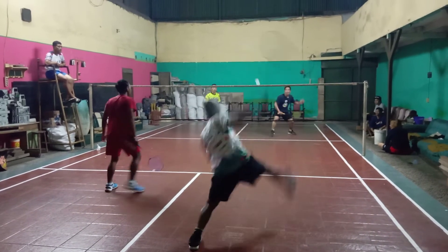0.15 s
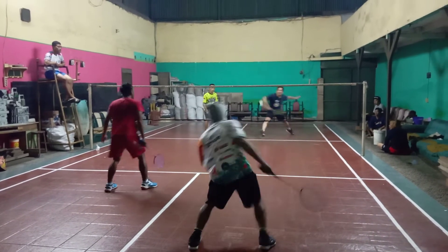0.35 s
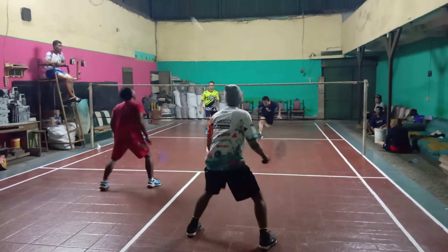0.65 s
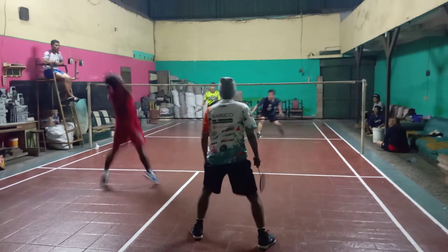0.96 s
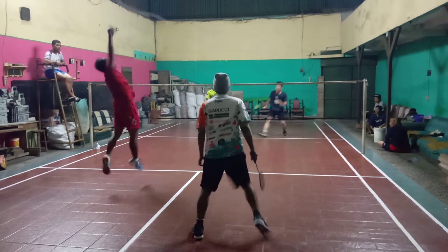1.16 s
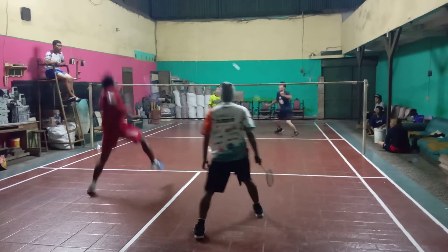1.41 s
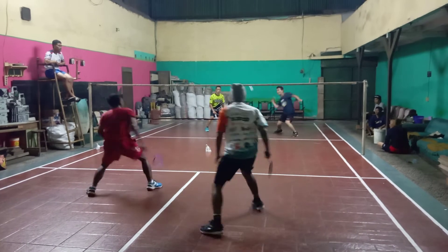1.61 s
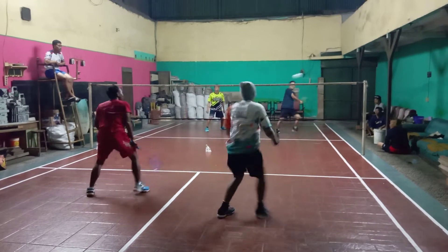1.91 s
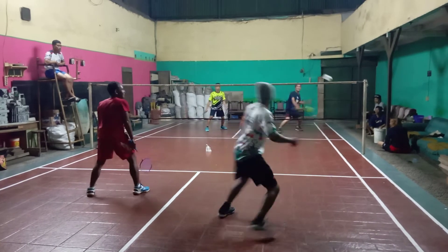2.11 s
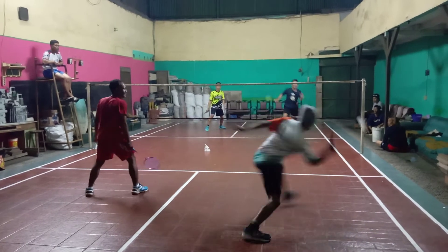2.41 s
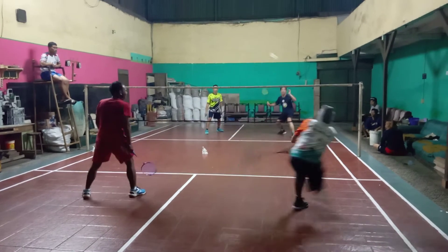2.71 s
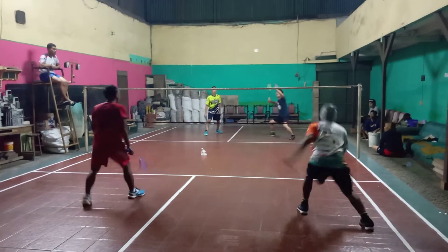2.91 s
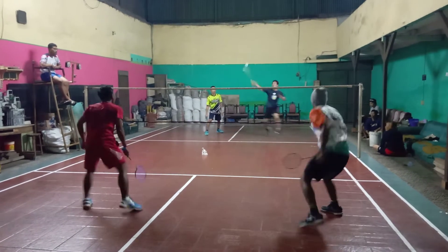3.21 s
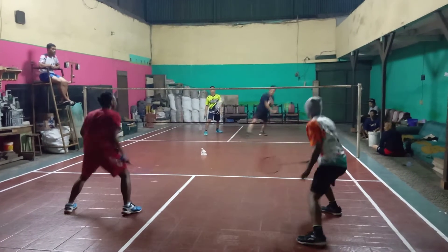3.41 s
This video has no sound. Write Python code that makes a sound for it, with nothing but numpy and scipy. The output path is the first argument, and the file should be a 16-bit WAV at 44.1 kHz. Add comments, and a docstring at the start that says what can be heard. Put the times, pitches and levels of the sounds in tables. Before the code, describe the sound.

Badminton rackets crack against a shuttlecock about six times, each hit echoing through a large sports hall. Between strokes, shoes thud, scuff and briefly squeak on the court, heard from behind the near baseline.

```python
"""A racket cracks and a large, hard-walled hall rings on: a badminton rally, heard from behind
the near baseline through one small microphone. Cork strikes the strings, setting them and the frame
ringing; floor, walls and roof throw the sound back. Between strokes, shoes thud, scuff and squeak
on the court, and one landing raises a low boom. Air swishes round the racket on the later strokes."""
import sys
import numpy as np
from scipy import signal
from scipy.fft import rfft, irfft
from scipy.io import wavfile

SR = 44100
rng = np.random.default_rng(int(sys.argv[2]) if len(sys.argv) > 2 else 0)


def unload_audio(sound):
    """Save the sound as a 16-bit wav file, at the path given as the first command line argument."""
    columns = np.transpose(np.atleast_2d(sound))
    # keep every value between -1 and 1, then stretch to whole-number steps
    steps = np.round(np.clip(columns, -1, 1) * 32767)
    wavfile.write(sys.argv[1], SR, steps.astype(np.int16))


N = 156555

# Racket strokes: start_s, direct_db, early_db, string_hz, string_db, frame_hz, frame_db,
# then crack_db in each of the six crack bands
STROKES = [ (-.012, -20, -4.5, 1085, 3, 3900, -13, 11.4, 6.9, 8.1, 8.5, 11, 11.6),
           (0.5079, -11, -7.5, 918, 4.5, 1420, -6.5, 1.5, 5.4, 2.4, 1, -2, 1.5),
           (1.2059, -6.5, -3.5, 1040, -3, 1950, -5, 12.1, 12.8, 6.8, 7, 6, 8.4),
           (1.7859, -14, -9, 938, -7, 2615, 6, 9, 7.9, 9.7, 11.5, 9, 10.6),
           (2.5894, -9, -8, 1086, 2.5, 1720, -4.5, 18.3, 12.6, 8.1, 9.5, 7.5, 9.5),
           (3.306, -11.5, -8.5, 1150, -13, 1740, -6, 17.5, 19.1, 16.3, 19, 9.5, 15)]
# Bands of the cork's crack: frequency_hz
CRACK_BANDS_HZ = [250, 600, 1200, 2500, 4200, 7000]
# Modes of the string bed: pitch_ratio, level_db, t60_s
STRING_MODES = [(0.998, 7.5, 0.048), (1.561, 3.5, 0.16), (2.08, -29, 0.15), (2.5, -8, 0.022),
                (3.42, -5, 0.024)]
# Bright edge of the sound that reaches the microphone directly: pitch_hz, level_db, t60_s
DIRECT_PINGS = [(6320, 6.5, 0.024), (14800, -12, 0.012)]
# Distinct returns from floor, walls and roof: arrival_s (scene time), level_db, smear_t60_s
ECHOES = [(.066, -9.5, 0.25), (0.089, -13, 0.083), (1.273, -9.5, 0.13), (1.7928, -6, 0.011),
          (1.798, -15.5, 0.0067), (1.814, -8, .03), (1.823, -9, 0.12), (2.5921, -7.5, 0.0053),
          (2.594, -8, 0.011), (2.6, -8.5, 0.039), (2.679, -13.5, 0.12), (3.315, -12, 0.022),
          (3.336, -19, 0.04), (3.343, -11, 0.035)]

# The hall's diffuse tail, one list each, band by band: frequency_hz, t60_s, level_db
HALL_BANDS_HZ = [125, 250, 450, 750, 1100, 2200, 4000, 6500, 10000, 15000]
HALL_T60_S = [1.47, 1, 1.6, 0.98, 0.97, 1.13, 1.36, 1.3, 1.02, 0.65]
HALL_DB = [-1.5, -3.5, -2, -1, -0.5, 0, 1, 1, -0.5, -2.5]
# Spectrum of the hall's quiet air: frequency_hz, level_db
ROOM_TONE = [(30, -6), (120, 10), (350, -11), (730, -50), (1400, 1.5), (3000, 4), (6500, -2),
             (11000, -9), (15000, -16)]

# Footfalls on the court: start_s, thud_db, thud_hz, slap_db, hall_db
FOOTFALLS = [(.108, 10.5, 190, -4.5, 0), (.163, 12.5, 164, -1, 2.5), (0.3421, 14, 370, -7, 0),
             (.396, -0.5, 278, -4.5, 1.5), (0.5079, 20.5, 214, -2, -4.5), (.541, 12.5, 480, -10, -20),
             (0.571, 13, 151, -20, -1.5), (0.703, 4, 193, -18, -10), (0.937, -30, 250, -24.5, 9),
             (1.017, -8.5, 353, -29, -5), (1.269, 13, 297, -25, -4), (1.449, 5.5, 350, -16, -1),
             (1.502, 16.5, 230, -7.5, -1), (1.573, 1.5, 398, -10, 7), (1.702, -0.5, 378, -7.5, -3),
             (2.198, 11, 307, -15, -6), (2.241, 3.5, 298, -13, -7), (2.856, 12.5, 293, -4, -5.5),
             (2.955, 0.5, 282, -4.5, 4)]
# Spectrum of a foot's thud: pitch_ratio, level_db
THUD_SPECTRUM = [(.25, -11.5), (.55, -6.5), (1, -5.5), (1.6, -13.5), (3, -20.5), (8, -30), (20, -54)]
# Spectrum of a sole's slap: frequency_hz, level_db
SLAP_SPECTRUM = [(200, -7.5), (700, -11.5), (1500, -5.5), (3000, -2), (6000, -6), (12000, -11.5)]
# Shoe scuffs and sharp ticks: start_s, pitch_hz, level_db, t60_s
SCUFFS = [(.346, 5660, 0, .2), (.368, 2840, 3, .1), (0.933, 3254, -28, 0.045), (0.984, 3380, -18, 0.092),
          (1.5688, 3240, -1, 0.0085), (1.569, 8100, -1, 0.011), (1.6107, 3920, 5, .006),
          (1.6101, 6000, 2.5, .008), (1.617, 4200, -14, .03), (1.706, 2520, -3.5, .06),
          (2.866, 2420, 10, 0.065), (3.2332, 4980, 6.5, 0.051), (3.234, 2580, 3.5, 0.063)]
# Spectrum of a scuff: pitch_ratio, level_db
SCUFF_SPECTRUM = [(.2, -14), (.7, -17), (1, -2), (1.35, -19), (3, -19.5)]
# Rubber soles squeaking: middle_s, half_length_s, pitch_hz, level_db
SQUEAKS = [(0.384, 0.018, 3020, -44), (3.477, 0.023, 4830, -36), (3.518, 0.033, 4820, -31)]

# Racket swings: top_speed_s, rise_s, pitch_hz, whistle_db, hiss_db
SWISHES = [(1.183, 0.021, 520, -46, -39.5), (1.787, .012, 990, -43.5, -49),
           (2.570, 0.035, 453.5, -44.5, -40.5), (3.303, .025, 1072, -45.5, -40)]
# Spectrum of air hissing through the strings: frequency_hz, level_db
HISS_SPECTRUM = [(600, -12), (1100, -2.5), (2800, -6), (6500, 0), (12000, 1)]

# Response of the microphone: frequency_hz, gain_db
MICROPHONE = [(30, -26), (75, -19.5), (125, -4.5), (200, 0), (4800, 0), (6500, 5), (8000, -3.5),
              (10000, -12), (12500, -18.5), (14000, -17.5), (14900, -4.5), (16000, -16)]


def undb(db):
    """Decibels to gain."""
    return 10 ** (np.asarray(db) / 20)


def noise():
    """White noise as long as the scene."""
    return rng.standard_normal(N)


def unit(x):
    """Scale to unit energy."""
    return x / np.sqrt(np.sum(x ** 2))


def fade(t, t60):
    """Exponential decay, 60 dB down after t60."""
    return np.exp(-np.log(1000) * t / t60)


def through(x, response):
    """Convolve, keeping the length."""
    return signal.fftconvolve(x, response)[:len(x)]


def lowpass(x, hz):
    """Roll off above hz at 12 dB an octave."""
    return signal.sosfilt(signal.butter(2, hz, fs=SR, output="sos"), x)


def colour(x, points, size=4096):
    """Minimum-phase filter that follows (frequency_hz, gain_db) points."""
    hz, db = np.array(points, float).T
    bins_hz = np.maximum(np.fft.rfftfreq(size, 1 / SR), 1)
    gain = undb(np.interp(np.log(bins_hz), np.log(hz), db))
    cepstrum = irfft(np.log(gain))
    cepstrum[1:size // 2] *= 2
    cepstrum[size // 2 + 1:] = 0
    return through(x, irfft(np.exp(rfft(cepstrum))))


def burst(t60, size=8192):
    """A dying spray of tiny contacts with an even spectrum and unit energy."""
    envelope = fade(np.arange(size) / SR, t60)
    limit = 2 * np.sqrt(2) * unit(envelope)
    x = rng.standard_normal(size) * envelope
    for _ in range(3):  # flatten the spectrum, then restore the decay
        spectrum = rfft(x)
        x = np.clip(irfft(spectrum / (np.abs(spectrum) + 1e-12)), -limit, limit)
    return unit(x)


def ring(x, hz, t60):
    """One damped mode driven by x, gain 1 at its pitch."""
    t = np.arange(len(x)) / SR
    envelope = fade(t, t60)
    return through(x, 2 * envelope * np.cos(2 * np.pi * hz * t) / envelope.sum())


def add(out, start_s, x):
    """Mix a sound in at start_s, dropping what falls outside the scene."""
    i = int(round(start_s * SR))
    x, i = x[max(-i, 0):], max(i, 0)
    out[i:i + len(x)] += x[:max(len(out) - i, 0)]


def strokes(early, tail):
    """Cork cracks on the strings, which ping with the frame; echoes and the hall answer."""
    out = np.zeros(N)
    for start_s, direct_db, early_db, string_hz, string_db, frame_hz, frame_db, *crack_db in STROKES:
        crack = colour(burst(t60=.014), list(zip(CRACK_BANDS_HZ, crack_db)))
        frame = undb(frame_db) * ring(crack, frame_hz, t60=.011)
        strings = sum(undb(string_db + db) * ring(crack, string_hz * ratio, t60)
                      for ratio, db, t60 in STRING_MODES)
        hit = crack + frame + strings
        edge = sum(undb(db) * ring(hit, hz, t60) for hz, db, t60 in DIRECT_PINGS)
        add(out, start_s, undb(direct_db) * (hit + edge))
        add(out, start_s, signal.fftconvolve(hit, undb(early_db) * early + tail))
        for arrival_s, db, smear_t60 in ECHOES:
            if 0 < arrival_s - start_s < .5:  # this stroke's own echoes
                add(out, arrival_s, undb(db) * through(hit, burst(smear_t60)))
    return out


def hall(gap_s=.0015, build_s=.022):
    """Responses of the hard walls: grainy early reflections, and a tail that dies band by band."""
    t = np.arange(2 * SR) / SR
    grains = rng.standard_normal(len(t)) * np.exp(.61 * rng.standard_normal(len(t)))
    early = grains * fade(t, t60=.2) * (t > gap_s)
    spectrum = rfft(rng.standard_normal(len(t)))
    log_hz = np.log(np.maximum(np.fft.rfftfreq(len(t), 1 / SR), 1))
    build_up = 1 - np.exp(-t / build_s)
    tail = 0
    for share, t60, db in zip(np.eye(len(HALL_BANDS_HZ)), HALL_T60_S, HALL_DB):
        band = irfft(spectrum * np.interp(log_hz, np.log(HALL_BANDS_HZ), share))
        tail += undb(db) * band * unit(fade(t, t60) * build_up)
    return unit(early), tail


def room_tone(level_db=-58):
    """The hall's quiet air: a steady low rumble and faint hiss."""
    return undb(level_db) * np.sqrt(N) * unit(colour(noise(), ROOM_TONE))


def shoes(early, tail, toe_lag_s=.009, toe_db=-2, scuff_hall_db=-11.5, early_db=-2.5):
    """Heel then toe thud and slap on the court; soles catch in short scuffs."""
    direct, to_hall = np.zeros(N), np.zeros(N)
    for start_s, thud_db, thud_hz, slap_db, hall_db in FOOTFALLS:
        thud_spectrum = [(ratio * thud_hz, db) for ratio, db in THUD_SPECTRUM]
        for lag_s, contact_db in ((0, 0), (toe_lag_s, toe_db)):
            thud = undb(thud_db) * colour(burst(t60=.026), thud_spectrum)
            slap = undb(slap_db) * colour(burst(t60=.059), SLAP_SPECTRUM)
            contact = undb(contact_db) * (thud + slap)
            add(direct, start_s + lag_s, contact)
            add(to_hall, start_s + lag_s, undb(hall_db) * contact)
    for start_s, pitch_hz, level_db, t60 in SCUFFS:
        scuff_spectrum = [(ratio * pitch_hz, db) for ratio, db in SCUFF_SPECTRUM]
        scuff = undb(level_db) * colour(burst(t60), scuff_spectrum)
        add(direct, start_s, scuff)
        add(to_hall, start_s, undb(scuff_hall_db) * scuff)
    return direct + undb(early_db) * through(direct, early) + through(to_hall, tail)


def squeaks(tail, wander_depth=.085, octave_db=-8, hall_db=-7):
    """Rubber sticks and slips on the court: a shrill, unsteady tone and its octave."""
    t, out = np.arange(N) / SR, np.zeros(N)
    wander = wander_depth * np.sqrt(N) * unit(lowpass(noise(), hz=450))
    for middle_s, half_length_s, pitch_hz, level_db in SQUEAKS:
        phase = 2 * np.pi * np.cumsum(pitch_hz * (1 + wander)) / SR
        envelope = np.exp(-((t - middle_s) / half_length_s) ** 2)
        out += undb(level_db) * envelope * (np.sin(phase) + undb(octave_db) * np.sin(2 * phase))
    return out + undb(hall_db) * through(out, tail)


def landing_boom(peak_s=.5, swell_s=.085, pitch_hz=128.7, level_db=-36.5):
    """A low hall resonance swells and dies as a player lands from a jump."""
    t = np.arange(N) / SR - peak_s
    return undb(level_db) * np.exp(-np.abs(t) / swell_s) * np.sin(2 * np.pi * pitch_hz * t)


def swishes(tail, fall_s=.06, glide_per_s=5.4, relative_width=.2, hall_db=-5):
    """Air whistles round the shaft, rising in pitch through the swing, and hisses in the strings."""
    t, out = np.arange(N) / SR, np.zeros(N)
    for top_speed_s, rise_s, pitch_hz, whistle_db, hiss_db in SWISHES:
        from_peak_s = t - top_speed_s
        speed = np.exp(-(from_peak_s / np.where(from_peak_s < 0, rise_s, fall_s)) ** 2)
        glide_hz = pitch_hz * np.clip(1 + glide_per_s * from_peak_s, .5, 2)
        eddies = lowpass(noise() + 1j * noise(), pitch_hz * relative_width / 2)
        whistle = np.real(eddies * np.exp(2j * np.pi * np.cumsum(glide_hz) / SR))
        hiss = colour(noise(), HISS_SPECTRUM)
        out += speed * np.sqrt(N) * (undb(whistle_db) * unit(whistle) + undb(hiss_db) * unit(hiss))
    return out + undb(hall_db) * through(out, tail)


def scene():
    """The rally from behind the near baseline, the same in both channels."""
    early, tail = hall()
    air = swishes(tail) + room_tone()
    mono = air + strokes(early, tail) + shoes(early, tail) + squeaks(tail) + landing_boom()
    return np.array([mono, mono])


def record(dry):
    """A small microphone: thin bass, two treble peaks and a steep cut above 15.9 kHz."""
    top_cut = signal.ellip(10, .2, 80, 15900, fs=SR, output="sos")
    return signal.sosfilt(top_cut, np.array([colour(channel, MICROPHONE) for channel in dry]))


dry = scene()
out = record(dry)
unload_audio(out)
```